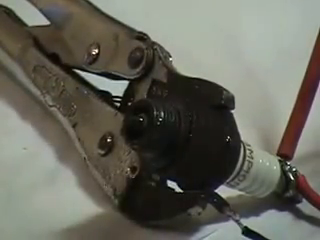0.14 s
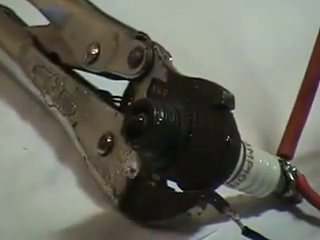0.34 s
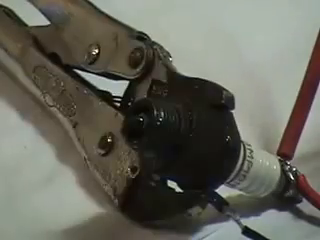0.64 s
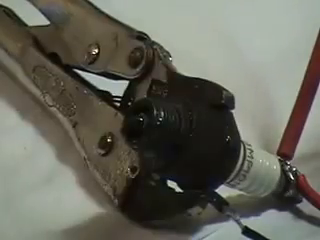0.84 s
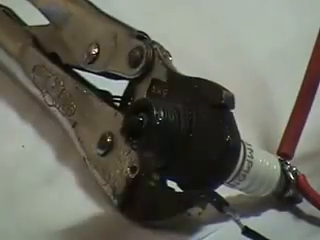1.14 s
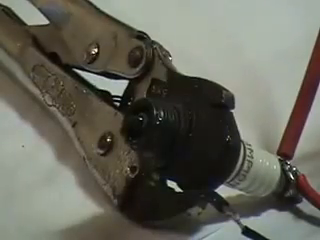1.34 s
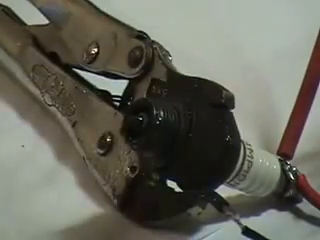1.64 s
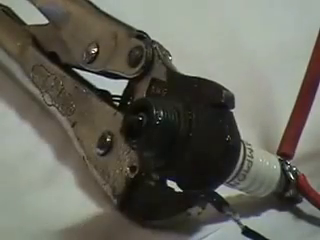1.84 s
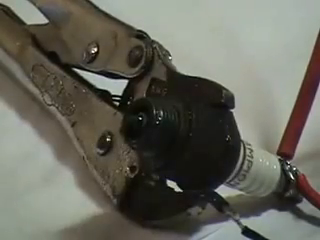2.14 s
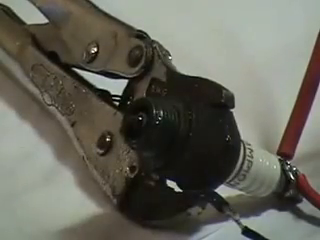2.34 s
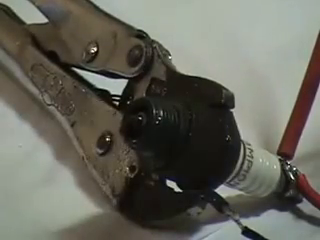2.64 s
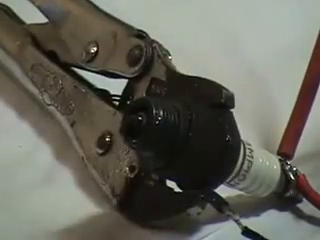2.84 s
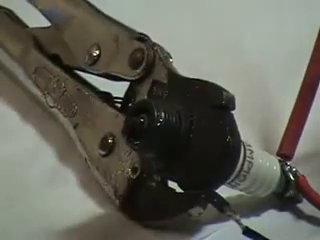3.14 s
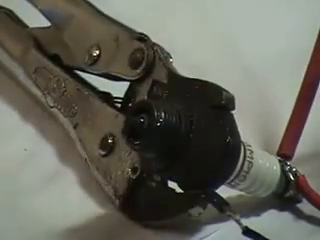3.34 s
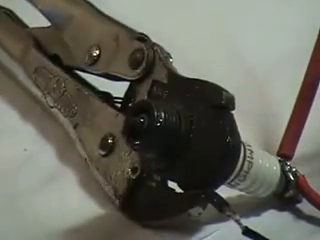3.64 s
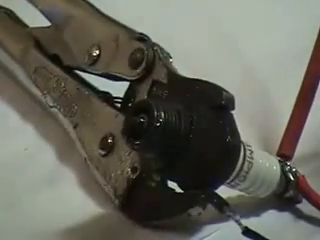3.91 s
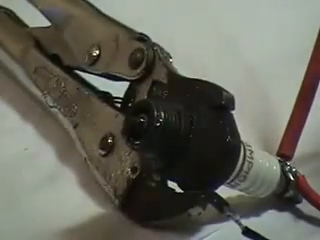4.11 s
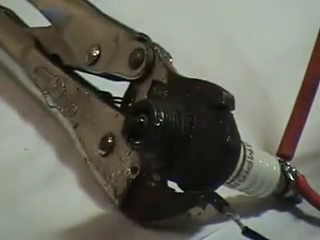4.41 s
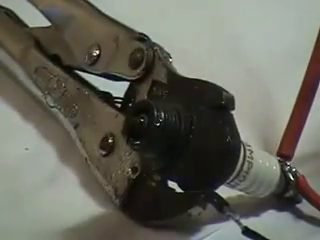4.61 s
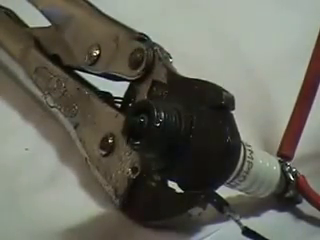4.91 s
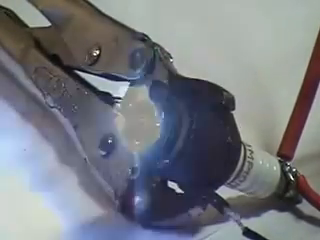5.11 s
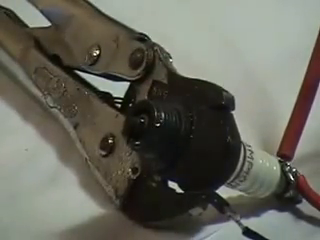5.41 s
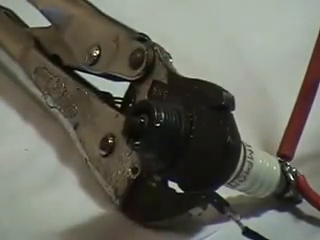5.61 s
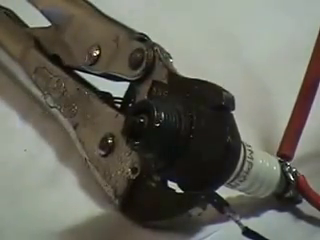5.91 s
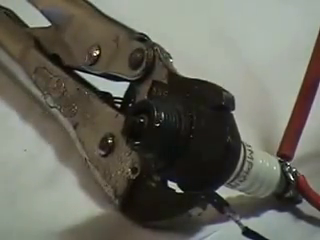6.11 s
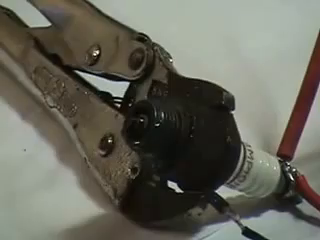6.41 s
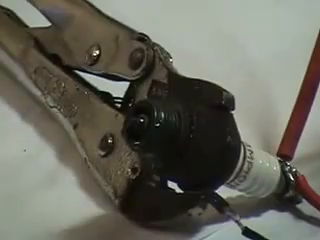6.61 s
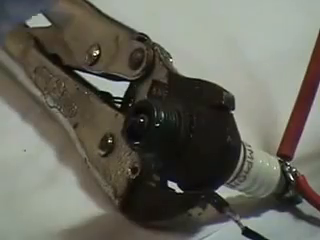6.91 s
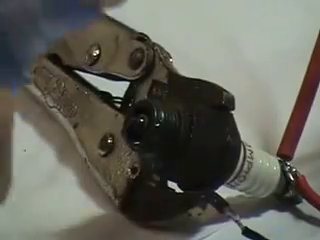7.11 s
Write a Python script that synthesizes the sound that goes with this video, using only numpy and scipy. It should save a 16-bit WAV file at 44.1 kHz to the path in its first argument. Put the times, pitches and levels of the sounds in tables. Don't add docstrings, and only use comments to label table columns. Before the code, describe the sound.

A spark plug on a workbench fires very loud, dry cracks at a strict beat, about three every two seconds. Each overloads the close stereo microphones, then decays as a bright, hissy room tail with a faint metallic ring from bench tools. Midway between cracks a much softer relay double click ticks in its small case. Low hiss, faint hum and a thin motor buzz continue underneath.

```python
import sys
import numpy as np
from scipy import signal
from scipy.fft import rfft, irfft, next_fast_len
from scipy.io import wavfile
from scipy.ndimage import uniform_filter1d

SR = 44100
rng = np.random.default_rng(int(sys.argv[2]) if len(sys.argv) > 2 else 0)


def boost(x):
    u = np.asarray(x, float) / 20
    return 10 ** u


def master(y):
    cut = np.clip(np.atleast_2d(y).T, -1, 1)
    pcm = np.round(cut * 32767)
    wavfile.write(sys.argv[1], SR, pcm.astype(np.int16))


N = 320155

FIRST_S, BEAT_S, TICK_DELAY_S = -.1194, .6794, .3351

# tail level/dB, ring f/Hz, ring gain/dB, gain of the dip above it/dB
SPARKS = [(-18.5, 4650, 6, -9.5), (-15, 4550, 4.5, -3), (-19, 4550, 5, -9), (-19, 4720, 7, -11.5),
          (-18.5, 4620, 5.5, -7.5), (-16, 4600, 4, -5.5), (-18, 4550, 5, -6.5), (-18.5, 4620, 5.5, -7.5),
          (-18, 4570, 5, -7.5), (-20.5, 4830, 7.5, -16), (-19.5, 4750, 7, -10)]
RING_WIDTH_HZ, DIP_WIDTH_HZ, DIP_RATIO = 250, 900, 1.148

# f/Hz, t60/s
ROOM_T60 = [(100, .13), (250, 0.27), (400, 0.42), (700, 0.7), (1700, 0.65), (4000, 0.57), (8000, 0.53),
            (12000, 0.4)]
# f/Hz, density/dB per Hz
ROOM_COLOUR = [(350, -13), (750, -8.5), (1500, -6.5), (2300, -4), (4200, -2), (8000, -3.5), (10500, -12),
               (13500, -24.5)]
# delay t/s, left level/dB, right level/dB, both re tail
NEAR_ECHOES = [(.0005, 10.5, 14), (.0035, 2.5, 2), (.009, 8, 3.5), (0.0155, -11, 0.5), (.020, -2.5, -3),
               (.026, 1.5, -1.5), (0.0372, -16.5, -7.5)]
# f/Hz, likeness/1
TAIL_LIKENESS = [(60, 0), (180, .5), (550, .6), (1650, .45), (4000, .62), (8000, .78), (15000, .75)]
# f/Hz, level/dB
TAIL_BALANCE = [(60, -3.5), (180, 3.5), (550, -5.5), (1650, -4), (4970, -1.5), (15000, -3.5)]
# f/Hz, phase/rad
LEFT_LEAD = [(300, -.2), (1700, .7), (4000, .5), (8000, .35), (11000, 0)]
BAND_EDGES_HZ = 90 * 2 ** np.arange(0, 7.4, 1 / 3)
SAME_PATH = 0.52
NEAR_LOW_SHARE, NEAR_SPLIT_HZ = 0.22, 2300
LOW_TAIL_DB = 0.5
MIC_DIP_HZ, MIC_DIP_WIDTH_HZ, MIC_DIP_DB = 3050, 600, -3.5
MIC_TOP_HZ = 14000

# f/Hz, level/dB, t60/s
BENCH = [(820, -38, .9), (964, -31, .6), (1647, -40, 1.0), (1690, -38, 1.0)]

# f/Hz, density/dB per Hz
HISS = [(75, -19), (125, -10), (480, -13), (720, -5.5), (1300, -12), (4600, -17), (10500, -27),
        (13000, -41)]
# f/Hz, likeness/1
HISS_LIKENESS = [(60, 1), (240, 0.62), (950, 0.21), (3770, 0.58), (15000, 0.26)]
# f/Hz, rms level/dB
HUM = [(242.2, -71), (597.5, -75.5), (915.2, -80), (1012, -77), (1141, -80), (1647, -74), (1690, -75),
       (2466, -81)]
# f/Hz, rms level/dB
BUZZ = [(2000, -96), (3000, -80), (4500, -79.5), (6000, -87), (7000, -81), (10000, -96)]
HISS_DB, BUZZ_HZ = -58.5, 149.85

# f/Hz, struck level/dB, room level/dB, t60/s
RELAY_CASE = [(2460, -4.5, -3.5, 0.0055), (3070, 0.5, -2, 0.006), (2960, 0, -4.5, 0.0033),
              (3650, -26, -13.5, 0.0079), (4220, -10, -17.5, 0.005), (7200, -13, -32, .004)]
# delay t/s, level/dB, brightness/dB per octave
TICK_ECHOES = [(.0062, -10, 0), (.012, -15, 4), (.016, -11, 6), (.023, -11, 6), (.036, -15, 12),
               (.042, -14, 12), (.048, -16, -12), (.063, -16, -20), (.067, -16, -20)]
# f/Hz, level/dB, ring t60/s, fade t60/s
SHELF = [(2390, -48, .05, .58), (2650, -47, .03, .3), (3200, -46, .04, .3)]
TICK_DB, TICK_SOFT_HZ = -22, 4500
BOUNCE_S, BOUNCE_DB = .00125, -6

# close level/dB, early level/dB, early from t/s, early until t/s
FORERUNNER = [
    (-24.5, -42.5, 0.019, 0),
    (-28, -35, 0.0097, 0.0077),
    (-31, -51, 0.053, .012),
    (-30.5, -65, .010, 0),
]
BLOCK, BLOCK_OFFSET = 1024, 530

# front t/s, front height/1, suction t/s, suction depth/1, rebound t/s, rebound height/1
SHOCK = [
    (.0006, 0.753, .0014, 0.25, 0.0023, 0.1),
    (.0006, 0.804, .00085, 2.8, 0.0019, .8),
]
FLUTTER_HZ, FLUTTER_HEIGHT, FLUTTER_T60_S = 1050, .25, .006

STRIP_DB = 2


def at_hz(points, hz):
    table_hz, values = np.array(points).T
    return np.interp(np.log(hz), np.log(table_hz), values)


def shaped(x, gain):
    size = next_fast_len(N)
    hz = np.maximum(np.arange(size // 2 + 1) * SR / size, 1)
    return irfft(rfft(x, size) * gain(hz), size)[..., :N]


def filtered(x, order, hz, kind="low"):
    return signal.sosfilt(signal.butter(order, hz, kind, fs=SR, output="sos"), x)


def bump(x, hz, width_hz, gain_db):
    b, a = signal.iirpeak(hz, hz / width_hz, fs=SR)
    return x + (boost(gain_db) - 1) * signal.lfilter(b, a, x)


def ring(clicks, hz, t60_s):
    radius = boost(-60 / (t60_s * SR))
    w = 2 * np.pi * hz / SR
    return signal.lfilter([0, np.sin(w)], [1, -2 * radius * np.cos(w), radius ** 2], clicks + 1e-18)


def stereo(mid, side, alike, right_mid):
    shared = np.array([mid, right_mid])
    opposed = side * [[1], [-1]]
    return np.sqrt(1 + alike) * shared + np.sqrt(1 - alike) * opposed


def since(times):
    now = np.arange(N) / SR
    latest = np.maximum(np.searchsorted(times, now, "right") - 1, 0)
    return latest, now - np.asarray(times)[latest]


def until(times):
    now = np.arange(N) / SR
    coming = np.minimum(np.searchsorted(times, now), len(times) - 1)
    return coming, np.where(times[coming] >= now, times[coming] - now, 1)


def block_place(times):
    into = (np.round(times * SR).astype(int) - BLOCK_OFFSET) % BLOCK
    return into / SR, 4 * into // BLOCK


def spark_times():
    return FIRST_S + BEAT_S * np.arange(len(SPARKS))


def spark_tail(times):
    latest, age = since(times)
    age_samples = np.minimum(np.round(age * SR).astype(int), SR - 1)
    path = rng.standard_normal((2, 2, SR))[..., age_samples]
    fresh = rng.standard_normal((2, 2, N))
    mid, side = np.sqrt(SAME_PATH) * path + np.sqrt(1 - SAME_PATH) * fresh
    right_mid = shaped(mid, lambda hz: np.exp(-1j * at_hz(LEFT_LEAD, hz)))

    near = 0
    for delay_s, left_db, right_db in NEAR_ECHOES:
        near = near + (boost([[left_db], [right_db]]) - 1) * np.exp(-((age - delay_s) / 0.00076) ** 2)
    fast_slope = 1 + 0.22 * boost(-60 * age / 0.058)
    strength = boost(np.array(SPARKS)[latest, 0] + 11) * fast_slope
    high_strength = strength * (1 + near)
    low_strength = strength * (1 + NEAR_LOW_SHARE * near) * boost(LOW_TAIL_DB)

    tail = 0
    for k, (low_hz, high_hz) in enumerate(zip(BAND_EDGES_HZ, BAND_EDGES_HZ[1:])):
        hz = np.sqrt(low_hz * high_hz)
        turn = k % 2
        pair = stereo(mid[turn], side[turn], at_hz(TAIL_LIKENESS, hz), right_mid[turn])
        balance_db = at_hz(TAIL_BALANCE, hz) / 2 * np.array([[1], [-1]])
        level_db = at_hz(ROOM_COLOUR, hz) + balance_db
        decay = boost(-60 * age / at_hz(ROOM_T60, hz))
        decay = decay * (low_strength if hz < NEAR_SPLIT_HZ else high_strength)
        tail = tail + boost(level_db) * filtered(pair * decay, 2, [low_hz, high_hz], "band")
    tail = filtered(tail, 2, 400, "high")

    coloured = []
    for k, (_, ring_hz, ring_db, dip_db) in enumerate(SPARKS):
        part = bump(tail[:, latest == k], ring_hz, RING_WIDTH_HZ, ring_db)
        coloured.append(bump(part, DIP_RATIO * ring_hz, DIP_WIDTH_HZ, dip_db))
    return bump(np.hstack(coloured), MIC_DIP_HZ, MIC_DIP_WIDTH_HZ, MIC_DIP_DB)


def bench(times):
    latest, age = since(times)
    rings = 0
    for hz, level_db, t60_s in BENCH:
        rings = rings + boost(level_db - 60 * age / t60_s) * np.sin(2 * np.pi * hz * age)
    onset = 1 - np.exp(-age / 0.0047)
    return rings * onset * boost(np.array(SPARKS)[latest, 0] + 15 + np.array([[-2], [2]]))


def hiss():
    mid, side = rng.standard_normal((2, N))
    mid = shaped(mid, lambda hz: np.sqrt(1 + at_hz(HISS_LIKENESS, hz)))
    side = shaped(side, lambda hz: np.sqrt(1 - at_hz(HISS_LIKENESS, hz)))
    noise = shaped(np.array([mid + side, mid - side]), lambda hz: boost(at_hz(HISS, hz)))
    return noise / np.sqrt(np.mean(noise ** 2) + 1e-20)


def hum():
    now = np.arange(N) / SR
    return sum(boost(rms_db + 3) * np.sin(2 * np.pi * (hz * now + rng.random())) for hz, rms_db in HUM)


def motor_buzz():
    cycle = np.arange(1024) / 1024
    shape = 0
    for k in range(14, 68):
        level_db = at_hz(BUZZ, k * BUZZ_HZ) - 4.1 * (k % 2) + rng.normal(0, 4.6)
        shape = shape + boost(level_db) * np.sin(2 * np.pi * (k * cycle + rng.random()))
    return np.interp(np.arange(N) / SR * BUZZ_HZ % 1, cycle, shape, period=1)


def background(times):
    recovery = np.exp(-since(times)[1] / 0.59)
    floor = boost(HISS_DB - 1.6 * recovery) * hiss() + boost(-6 * recovery) * (hum() + motor_buzz())
    coming, ahead = until(times)
    into_s, quarter = block_place(times)
    silent_s = np.where(quarter == 1, 0, into_s + (quarter == 0) * BLOCK / SR)
    hush = 1 - np.exp(-(ahead / (silent_s[coming] + 1e-4)) ** 8)
    return floor * hush * boost([[-1.5], [1.5]])


def relay(times):
    age = np.arange(SR) / SR

    def click(delay_s, level_db):
        return -boost(level_db) * (np.arange(SR) == round(delay_s * SR)) * boost([[-4], [2.5]])

    strike = click(0, 0) + click(BOUNCE_S, BOUNCE_DB)
    path = rng.standard_normal((2, SR)) * (age > .003)
    room = path * boost(-34.5 - 60 * age / 0.35)
    rings = 0
    for hz, level_db, t60_s, fade_s in SHELF:
        rings = rings + ring(path * boost(level_db - 60 * age / fade_s), hz, t60_s)
    for hz, struck_db, room_db, t60_s in RELAY_CASE:
        octaves = np.log2(hz / 2700)
        echoes = sum(click(s, level_db + bright_db * octaves) for s, level_db, bright_db in TICK_ECHOES)
        rings = rings + ring(boost(struck_db) * strike + boost(room_db) * (echoes + room), hz, t60_s)
    rings = filtered(rings, 6, 2000, "high")
    rings = filtered(rings, 1, TICK_SOFT_HZ)
    elapsed = np.round(since(times)[1] * SR).astype(int)
    return boost(TICK_DB) * rings[:, np.maximum(elapsed, 0)] * (elapsed >= 0)


def forerunner(times):
    coming, ahead = until(times)
    quarter = block_place(times)[1]
    close_db, early_db, start_s, end_s = np.array(FORERUNNER)[quarter][coming].T
    noise = filtered(rng.standard_normal((2, N)), 1, [200, 7000], "band")
    close = boost(close_db + 7.5) * np.exp(-(ahead / 0.0033) ** 2)
    window = uniform_filter1d(1. * (ahead < start_s) * (ahead > end_s), size=130)
    return noise * (close + window * boost(early_db + 15.5 - 690 * ahead))


def shock(times):
    age = since(times - .0006)[1]
    out = []
    for front_s, front, suction_s, suction, rebound_s, rebound in SHOCK:
        after = age - front_s - suction_s
        wave = np.where(age < front_s, front * age / front_s, -suction)
        out.append(np.where(after > 0, rebound * np.exp(-(after / rebound_s) ** 2), wave))
    age = since(times)[1]
    flutter = FLUTTER_HEIGHT * np.sin(2 * np.pi * FLUTTER_HZ * age) * boost(-60 * age / FLUTTER_T60_S)
    out[0] = out[0] - flutter
    return np.array(out)


def scene():
    times = spark_times()
    sparks = spark_tail(times) + bench(times) + forerunner(times) + shock(times)
    return sparks + background(times) + relay(times + TICK_DELAY_S)


def thin_top(x):
    hz, frame_s, frames = signal.stft(x, SR, nperseg=1024)
    strip = (hz // 80).astype(int)
    group = np.arange(len(frame_s)) // 4
    draw = rng.random((strip.max() + 1, len(frame_s) // 4 + 1))[strip][:, group]
    share = np.interp(hz, [9800, 10600, 10700, 11300, 11400, 13300, 13700], [1, .6, 0, 0, .4, .33, 0])
    frames = frames * boost(STRIP_DB * (hz > 11000))[:, None]
    kept = signal.istft(frames * (draw < share[:, None]), SR, nperseg=1024)[1][:, :N]
    times = spark_times()[1:]
    at_front = np.exp(-(since(times - .003)[1] - .0035) ** 2 / .0016 ** 2)
    before = np.exp(-((until(times)[1] - .017) / .011) ** 6)
    whole = np.maximum(boost(-5) * at_front, before)
    return kept + whole * (x - kept)


def low_pass(x):
    return signal.sosfilt(signal.butter(12, 15910, fs=SR, output="sos"), x)


def record(dry):
    soft = filtered(np.clip(dry, -.95, .95), 4, MIC_TOP_HZ)
    mix = thin_top(soft)
    return low_pass(mix)


dry = scene()
out = record(dry)
master(out)
```